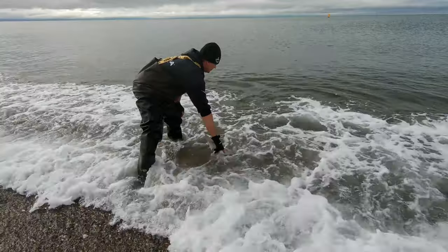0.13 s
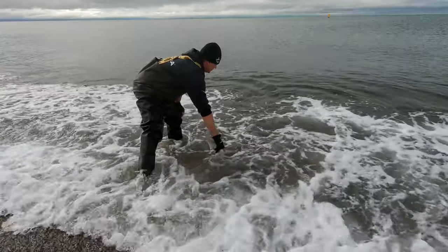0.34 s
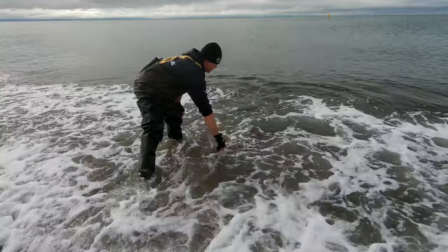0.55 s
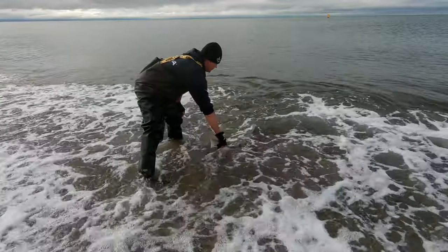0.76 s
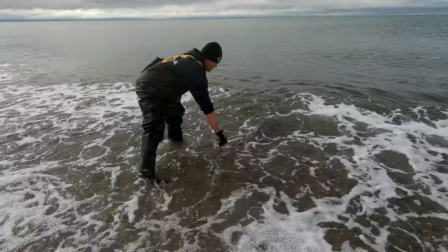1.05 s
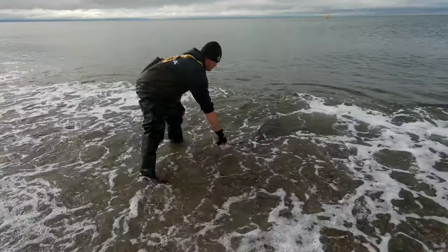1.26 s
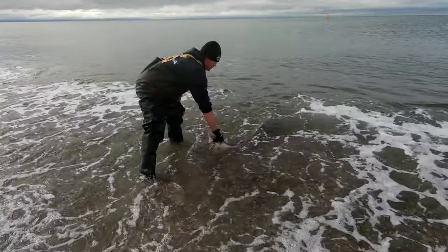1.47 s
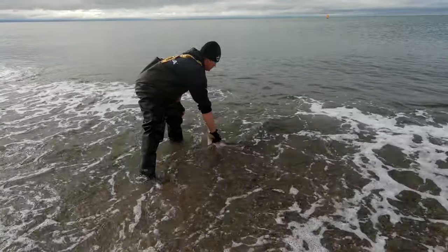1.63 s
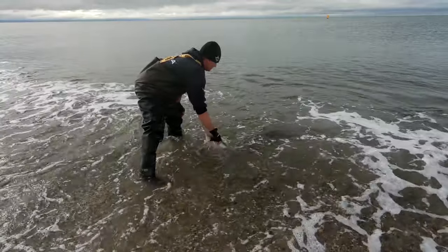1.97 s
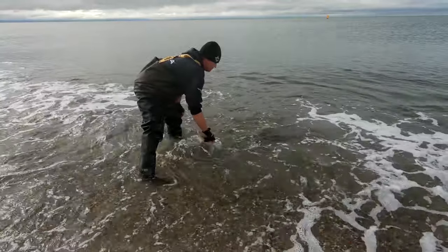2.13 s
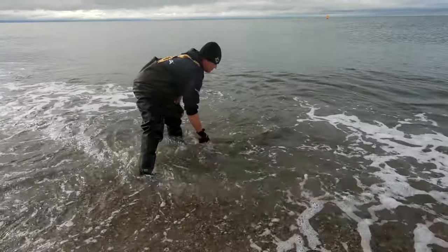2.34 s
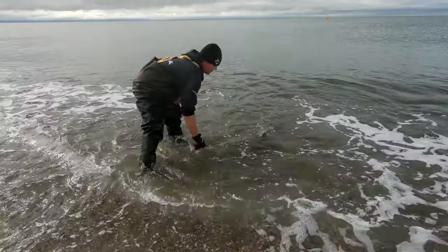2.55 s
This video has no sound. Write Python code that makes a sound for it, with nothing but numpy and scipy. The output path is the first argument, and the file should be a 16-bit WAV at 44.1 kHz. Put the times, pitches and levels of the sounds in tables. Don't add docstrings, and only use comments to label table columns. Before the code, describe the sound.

A small wave breaks close by on a pebble beach, its roar fading into fizzing foam; soft watery slaps hit the recorder's housing early, then backwash gurgles, plops and knocks pebbles. Open air, light low wind, uneven stereo.

```python
import sys
import numpy as np
from scipy import signal
from scipy.fft import rfft, irfft
from scipy.io import wavfile
from scipy.ndimage import uniform_filter1d

SR = 44100
rng = np.random.default_rng(int(sys.argv[2]) if len(sys.argv) > 2 else 0)


def unload_audio(sound):
    columns = np.transpose(np.atleast_2d(sound))
    steps = np.round(np.clip(columns, -1, 1) * 32767)
    wavfile.write(sys.argv[1], SR, steps.astype(np.int16))


def invert_db(level):
    return 10 ** (np.asarray(level, dtype=float) / 20)


N = 119070

# (frequency [Hz], level [dB])
WIND_COLOUR = [(15, -4), (40, 5), (90, -6), (130, -3), (200, -64), (400, -22)]
# (time [s], level [dB])
WIND_GUSTS = [(0.0, -65), (0.04, -65), (0.06, -68), (0.14, -48), (0.19, -61), (0.65, -67), (0.92, -55),
              (1.12, -92), (1.3, -80), (1.38, -59), (1.42, -71), (1.54, -85), (2.12, -69), (2.35, -87),
              (2.36, -69), (2.58, -75), (2.65, -58), (2.7, -72)]
# (time [s], peak [dB], frequency [Hz], length [cycles])
WIND_PUSHES = [
    (.12, -47, 60, 2.5),
    (.28, -58, 50, 3),
    (.37, -51, 55.5, 3),
    (.86, -52, 50, 4.3),
    (.94, -51, 60, 3),
    (1.345, -55, 40, 2),
    (2.08, -66, 55, 3),
]
# (frequency [Hz], level [dB])
FAR_SURF_COLOUR = [(70, -41), (115, -52), (150, 0.5), (400, 0.5), (700, 1), (1100, -27), (2500, -23.5),
                   (5000, -17.5)]
# (time [s], level [dB])
FAR_SURF_SWELL = [
    (0, -66),
    (1.1, -64.5),
    (1.5, -51.5),
    (1.9, -48),
    (2.2, -53.5),
    (2.45, -58),
    (2.7, -47.5),
]
# (time [s], peak [dB], frequency [Hz], length [s])
HOUSING_SLAPS = [
    (.327, -31, 1120, .01),
    (.338, -35, 295, .014),
    (.427, -36, 750, 0.008),
    (.535, -47, 304, .012),
    (.8, -40, 1000, 0.009),
    (.84, -33, 600, 0.007),
    (.935, -42, 750, 0.01),
]
# (time [s], peak [dB], frequency [Hz], length [cycles])
HOUSING_RINGS = [
    (.322, -29, 1130, 14),
    (.33, -29, 270, 5),
    (.425, -33, 250, 9),
    (.57, -40, 300, 12),
    (.837, -27, 300, 6),
    (.86, -36, 240, 6),
    (.93, -40, 260, 6),
]
# (time [s], level [dB])
BACKWASH_FLOW = [
    (0, -63),
    (1.9, -73),
    (2.1, -70),
    (2.3, -52),
    (2.42, -57),
    (2.5, -52.5),
    (2.62, -51.5),
    (2.7, -51),
]
# (time [s], peak [dB], frequency [Hz], length [cycles], pitch climb [ratio])
PEBBLE_KNOCKS = [(2.0238, -39, 2700, 3.4, 0.01), (2.063, -42, 1490, 11, 0.057), (2.0838, -35, 1250, 3, .04),
                 (2.0835, -35, 1750, 3, .04), (2.146, -45, 3100, 4, .05), (2.2617, -33, 2450, 6, .04),
                 (2.265, -36, 3050, 8, .03), (2.27, -44, 1700, 4, 0.018), (2.279, -42, 3500, 5, -0.033),
                 (2.2951, -26, 2300, 1.6, 0.21), (2.3135, -41, 2600, 5, 0.025), (2.316, -40, 4200, 5, .04),
                 (2.3245, -38, 3300, 3.2, .04), (2.326, -37, 4800, 5.5, -0.0082),
                 (2.331, -49, 2700, 6, 0.067), (2.3538, -47, 3600, 5, .04), (2.355, -46, 1730, 7, .04),
                 (2.362, -38.5, 3800, 8, -.04), (2.386, -32.5, 2970, 9.1, 0.067),
                 (2.407, -38, 4100, 4, .04), (2.437, -45, 2600, 3, .04), (2.446, -40, 2500, 4, .04),
                 (2.4863, -35, 3200, 4.2, .04), (2.5615, -25.5, 2550, 3.2, .17), (2.564, -43, 3900, 6, .06),
                 (2.5757, -45, 2870, 16, -0.041), (2.579, -40, 2750, 10, .01), (2.604, -46, 3250, 7.6, .04),
                 (2.611, -45, 2500, 1.3, .04), (2.6366, -45, 2680, 5, -0.0071),
                 (2.639, -43, 1490, 2.4, 0.023), (2.6455, -30, 1800, 2.3, .1), (2.6461, -26, 4200, 1.4, .1),
                 (2.6483, -40, 3300, 7.1, 0.012), (2.6525, -37, 4400, 1.5, .1), (2.65, -39, 2400, 3, .04),
                 (2.633, -43, 2600, 9, .03), (2.627, -43, 1500, 7, .04), (2.667, -51, 2880, 4, .04),
                 (2.696, -42, 2200, 1.6, .04)]
# (time [s], peak [dB], frequency [Hz])
LARGE_BUBBLES = [(0.324, -41, 1270), (2.022, -34, 457), (2.108, -39, 1210), (2.12, -37.5, 610),
                 (2.158, -31, 915), (2.184, -34.5, 1060), (2.261, -35.5, 650), (2.296, -31, 1000),
                 (2.366, -29, 810), (2.4, -36, 1010), (2.419, -32.5, 820), (2.525, -34, 750),
                 (2.563, -32, 990), (2.299, -41.5, 208), (2.216, -36.5, 404), (2.165, -40, 336),
                 (2.615, -34, 720)]
# (time [s], peak [dB], frequency [Hz], length [s])
LEG_SPLASHES = [
    (.328, -47, 3050, 0.0057),
    (2.084, -50, 1400, 0.0031),
    (2.268, -48, 2000, 0.0086),
    (2.318, -46.5, 3600, 0.019),
    (2.411, -48.5, 1030, 0.029),
    (2.436, -54.5, 2500, 0.017),
    (2.651, -49, 2700, 0.0088),
    (2.63, -49, 1190, 0.018),
    (2.695, -50.5, 1800, 0.0056),
]
# (time [s], peak [dB], centre frequency [Hz], length [s])
NOISE_SURGES = [(.015, -38, 850, .03), (.05, -39, 905, .03), (.08, -43, 1100, 0.019), (.5, -40, 790, .04),
                (.57, -46, 890, .04), (.635, -41, 990, .03), (.7, -42.5, 510, .045), (.77, -49.5, 380, .04),
                (1.24, -52, 1100, .02), (1.86, -58, 188, 0.026), (2.41, -48, 900, .04)]
# (time [s], level [dB])
WAVE_DECAY = [(0, 1.5), (.03, 0), (.07, 0), (.1, 0), (.2, -0.5), (.33, -1.5), (.39, -4.5), (.45, -4),
              (.55, -5), (.6, -7.5), (.64, -7.5), (.82, -10), (1.07, -13), (1.23, -13.5), (1.5, -17.5),
              (1.85, -20.5), (2.2, -20), (2.7, -24.5)]
# (frequency [Hz], level [dB])
ROAR_COLOUR = [(95, -32), (150, -6.5), (250, -4.5), (480, -2), (860, -0.5), (1400, -6), (2200, -10.5),
               (4200, -16)]
FIZZ_COLOUR = [(2500, -13.5), (4300, -11.5), (5300, -2), (6400, 2), (7600, -5), (8700, -17), (11500, -1),
               (15000, -6.5)]
FOAM_COLOUR = [(5000, -19), (8000, -3.5), (11000, 2.5), (15500, -0.5)]
THUMP_COLOUR = [(40, -26), (90, -9), (150, 0), (260, -14), (500, -38)]
# (frequency [Hz], coherence [0 to 1])
PORT_LIKENESS = [(60, .3), (260, .05), (400, .5), (540, .92), (750, .99), (1700, .88), (4200, .78),
                 (5200, .1)]
# (frequency [Hz], gain [dB])
LEFT_GAIN = [(150, -6.5), (290, -4.5), (430, -14), (690, -6), (830, -2.5), (1120, -1), (3300, -2.5),
             (4300, -9.5)]
LEFT_TREBLE = [(4300, -0.5), (5300, -14.5), (6500, -32), (8600, -29), (10500, -14), (13000, -11),
               (15500, -14)]
# (frequency [Hz], phase [rad])
LEFT_PHASE = [(200, 0.2), (340, 1.6), (440, 2.85), (690, 2.65), (1120, 2.42), (1720, 2.05), (3000, 1.5),
              (4300, .97)]
# (frequency [Hz], gain [dB])
TREBLE_LOSS = [(8800, 0.5), (10200, -14), (11800, -26), (14300, -27.5), (15100, -32), (15800, -41)]
# (frequency [Hz], level [dB])
PORT_HISS = [(2000, -20), (5000, 2), (10500, -5), (13800, -5), (15200, -10), (15800, -30)]

ROAR_DB, CHURN_DB, FIZZ_DB, THUMP_DB = -30, -44, -34.5, -39.5
FOAM_DB = -7
ROAR_FOLLOW, FIZZ_FOLLOW = 0.97, 0.52
THUMP_S = 0.13
CHURN_PER_S, GURGLE_PER_S, SPRAY_PER_S = 900, 500, 1200
SPRAY_DB = -5
PLOP_CYCLES, PLOP_RISE = 6.5, 0.057
PORT_HISS_DB = -82
CONTRAST = 0.043
EDGE_HZ, EDGE_SAG_HZ = 15750, 330
GATE_HZ, GATE_SHARE = 10500, 0.5


def evened(x):
    return x / np.sqrt(np.mean(x ** 2) + 1e-20)


def read(points, hz):
    f, value = np.transpose(points)
    return np.interp(np.log(hz + 1), np.log(f + 1), value)


def control(table):
    return np.interp(np.arange(N) / SR, *np.transpose(table))


def hiss(shape, patchy_db, flicker_db):
    frames = N // 128 + 5
    a, b, c, d, patch, flick = rng.standard_normal((frames, 257, 6)).T
    patch = uniform_filter1d(uniform_filter1d(patch, size=6, axis=0), size=20, axis=1)
    flick = uniform_filter1d(uniform_filter1d(flick, size=60, axis=0), size=4, axis=1)
    unevenness = invert_db(patchy_db * evened(patch) + flicker_db * evened(flick))
    z = np.array([a + 1j * b, c + 1j * d]) * unevenness
    x = signal.istft(z, nperseg=512, noverlap=384)[1][:, :N]
    colour = invert_db(read(shape, np.fft.rfftfreq(N, 1 / SR)))
    return evened(irfft(rfft(x) * colour, N))


def bubble(hz, cycles, rise):
    t = np.arange(int(3 * SR * cycles / hz) + 40) / SR
    u = t * hz / cycles
    start = np.sin(np.pi / 2 * np.minimum(t * hz / 1.5, 1)) ** 2
    return start * np.exp(-2.3 * u) * np.sin(2 * np.pi * hz * t * (1 + rise * u))


def bubbles(per_s, low_hz, high_hz, spread_db, cycles):
    loudness, chance, kind = rng.random((N, 2, 3)).T
    strength = invert_db(spread_db * np.minimum(-np.log(loudness + 1e-9), 4)) * (chance < per_s / SR)
    kind = (kind * 24).astype(int)
    out = np.zeros((2, N))
    for k, hz in enumerate(np.geomspace(low_hz, high_hz, 24)):
        ring = bubble(hz, cycles, 0.13)[None]
        out += signal.oaconvolve(strength * (kind == k), ring, axes=1)[:, :N]
    return evened(out)


def place(tones):
    out = np.zeros(N + SR)
    for s, db, tone in tones:
        out[round(s * SR):][:len(tone)] += invert_db(db) * tone
    return out[:N]


def bursts(table):
    out = np.zeros(N + SR)
    t = np.arange(4410) / SR
    for s, db, hz, length in table:
        band = signal.butter(2, [hz / 2.33, hz * 1.46], "band", fs=SR, output="sos")
        noise = evened(signal.sosfilt(band, rng.standard_normal(4410)))
        shape = np.e * 2 * t / length * np.exp(-2 * t / length)
        out[round((s - length / 2) * SR):][:4410] += invert_db(db) * noise * shape
    return out[:N]


def wind():
    pushes = place([(s, db, bubble(hz, cycles, 0)) for s, db, hz, cycles in WIND_PUSHES])
    return invert_db(control(WIND_GUSTS) + 0.5) * hiss(WIND_COLOUR, patchy_db=1.0, flicker_db=-0.5) + pushes


def far_surf():
    return invert_db(control(FAR_SURF_SWELL)) * hiss(FAR_SURF_COLOUR, patchy_db=1.1, flicker_db=-0.06)


def housing():
    rings = place([(s, db, bubble(hz, cycles, -0.033)) for s, db, hz, cycles in HOUSING_RINGS])
    return (bursts(HOUSING_SLAPS) + rings) * invert_db([[0], [-20]])


def backwash():
    gurgle = bubbles(GURGLE_PER_S, low_hz=600, high_hz=2800, spread_db=1.3, cycles=5)
    spray = invert_db(SPRAY_DB) * bubbles(SPRAY_PER_S, low_hz=1390, high_hz=4600, spread_db=3.5, cycles=2.2)
    return invert_db(control(BACKWASH_FLOW)) * (gurgle + spray)


def pebbles_and_drops():
    knocks = [(s, db + 6, bubble(hz, cycles, rise)) for s, db, hz, cycles, rise in PEBBLE_KNOCKS]
    plops = [(s, db, bubble(hz, PLOP_CYCLES, PLOP_RISE)) for s, db, hz in LARGE_BUBBLES]
    return place(knocks + plops) + bursts(LEG_SPLASHES)


def wave():
    fall = control(WAVE_DECAY)
    roar = invert_db(ROAR_DB) * hiss(ROAR_COLOUR, patchy_db=0.6, flicker_db=0.5)
    churn = invert_db(CHURN_DB) * bubbles(CHURN_PER_S, low_hz=500, high_hz=1500, spread_db=2.5, cycles=5)
    fizz = invert_db(FIZZ_DB) * hiss(FIZZ_COLOUR, patchy_db=0.46, flicker_db=0.7)
    foam = invert_db(FIZZ_DB + FOAM_DB) * hiss(FOAM_COLOUR, patchy_db=1.2, flicker_db=-0.5)
    blow = np.exp(-(np.arange(N) / SR / THUMP_S) ** 2)
    thump = invert_db(THUMP_DB) * hiss(THUMP_COLOUR, patchy_db=1.5, flicker_db=2.5) * blow
    return (roar + churn) * invert_db(ROAR_FOLLOW * fall) + fizz * invert_db(FIZZ_FOLLOW * fall) + thump + foam


def scene():
    own, right = rfft(wind() + far_surf() + backwash() + wave())
    same = np.clip(read(PORT_LIKENESS, np.fft.rfftfreq(N, 1 / SR)), 0, 1)
    left = same * right + np.sqrt(1 - same ** 2) * own
    ports = irfft([left, right], N)
    return ports + housing() + pebbles_and_drops() + bursts(NOISE_SURGES)


def top_cut(x):
    return signal.sosfilt(signal.butter(12, 15690, fs=SR, output="sos"), x)


def record(dry):
    size = N + 4410
    hz = np.fft.rfftfreq(size, 1 / SR)
    left = invert_db(read(LEFT_GAIN, hz) + read(LEFT_TREBLE, hz)) * np.exp(1j * read(LEFT_PHASE, hz))
    own_hiss = rfft(rng.standard_normal((2, N)), size) * invert_db(PORT_HISS_DB + read(PORT_HISS, hz))
    heard = rfft(dry, size) * [left, np.ones_like(left)] * invert_db(read(TREBLE_LOSS, hz))
    x = irfft(heard + own_hiss, size)[:, :N]
    f, t, z = signal.stft(x, SR, nperseg=1024, noverlap=512)
    usual = uniform_filter1d(uniform_filter1d(abs(z), size=15, axis=1), size=3, axis=2) + 1e-12
    sag = np.repeat(rng.exponential(1, len(t)), 2)[:len(t)]
    below_edge = f[:, None] < EDGE_HZ - EDGE_SAG_HZ * sag
    strong = (f[:, None] < GATE_HZ) | (abs(z) > GATE_SHARE * usual)
    z = z * below_edge * strong * (abs(z) / usual) ** CONTRAST
    mix = signal.istft(z, nperseg=1024, noverlap=512)[1][:, :N]
    return top_cut(mix)


dry = scene()
out = record(dry)
unload_audio(out)
```